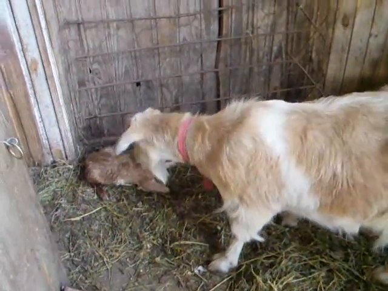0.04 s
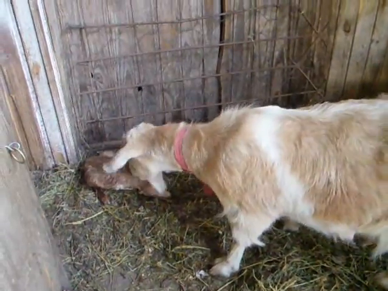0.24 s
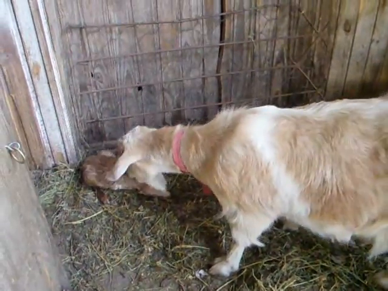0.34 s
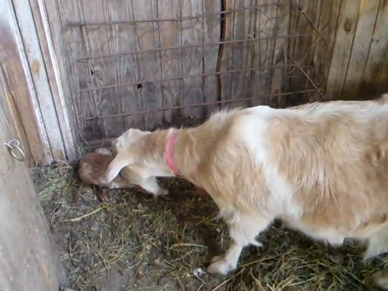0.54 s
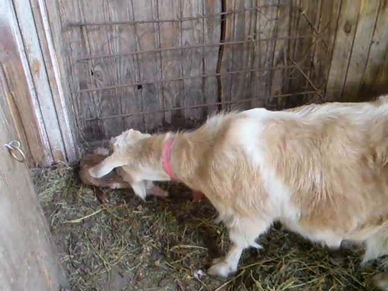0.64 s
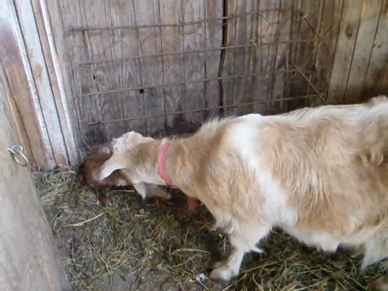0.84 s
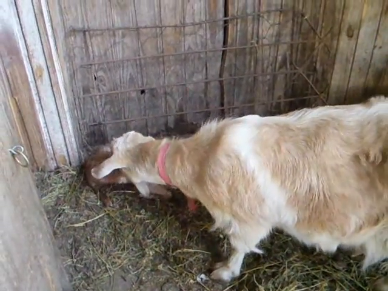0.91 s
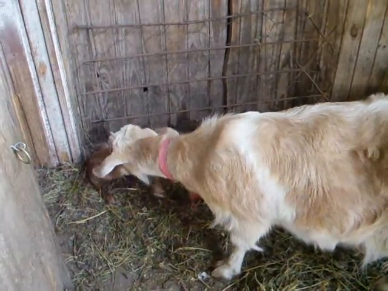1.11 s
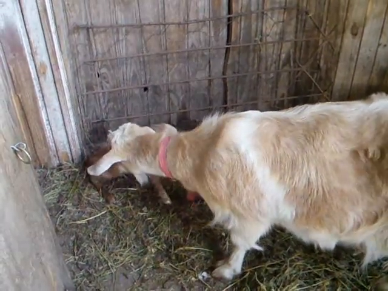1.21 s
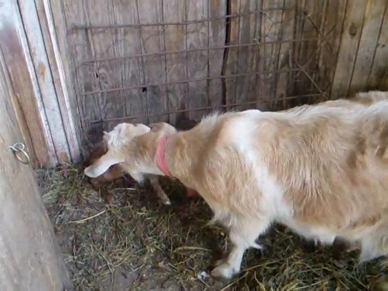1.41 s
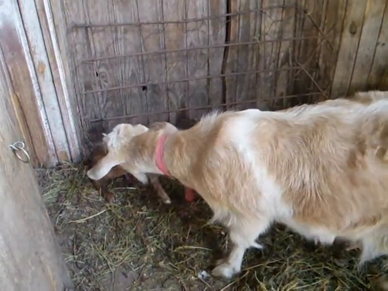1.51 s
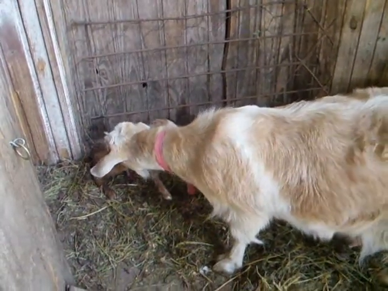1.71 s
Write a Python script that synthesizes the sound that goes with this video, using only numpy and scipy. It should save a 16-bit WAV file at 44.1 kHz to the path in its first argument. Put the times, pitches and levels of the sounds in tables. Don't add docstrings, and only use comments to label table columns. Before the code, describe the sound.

One loud, hoarse-edged kid bleat in a small wooden stall, followed by quiet, creaky goat murmurs.

```python
import sys
import numpy as np
from scipy import signal
from scipy.fft import rfft, irfft
from scipy.io import wavfile
from scipy.ndimage import uniform_filter1d

SR = 44100
rng = np.random.default_rng(int(sys.argv[2]) if len(sys.argv) > 2 else 0)


def ratio_of_db(decibels):
    return 10 ** (np.asarray(decibels, float) / 20)


def store_wav(level_fs):
    pcm = np.round(np.clip(np.atleast_2d(level_fs), -1, 1) * 32767)
    wavfile.write(sys.argv[1], SR, pcm.T.astype(np.int16))


N = 77175
TIME_S = np.arange(N) / SR


def evened(x):
    return x / np.sqrt(np.mean(x ** 2) + 1e-20)


def read(points, hz):
    table_hz, value = np.transpose(points)
    return np.interp(np.log(hz + 1), np.log(table_hz + 1), value)


def coloured(x, points):
    gain = ratio_of_db(read(points, np.fft.rfftfreq(len(x), 1 / SR)))
    return irfft(rfft(x) * gain, len(x))


def resonate(x, hz, width_hz):
    turn = np.exp(2j * np.pi * np.cumsum(hz * np.ones(len(x))) / SR)
    decay = np.exp(-np.pi * abs(width_hz) / SR)
    return 2 * (turn * signal.lfilter([1 - decay], [1, -decay], x / turn + 1e-18)).real


def formant(x, hz, width_hz):
    return resonate(resonate(x, hz, width_hz), hz, 2 * width_hz)


def wobble(size):
    return evened(uniform_filter1d(uniform_filter1d(rng.standard_normal(N), size), size))


# start_s, pitch_hz, effort_db, mouth_opening (factor), brightness_db
BLEAT_COURSE = [
    (0.139, 375, -32, 0.87, 1),
    (0.23, 380.2, -22.5, 0.9, 2),
    (0.258, 402.5, -0.5, 0.96, -9.5),
    (0.329, 405.1, -11, 1.037, 0.36),
    (.46, 409.5, -7, 1.045, -3.3),
    (.52, 413.4, -7.5, 1.094, -2.5),
    (0.784, 425.1, -7, 1.143, -1.2),
    (0.871, 386.5, -9.5, 0.9, -2.5),
    (0.978, 375.3, -45.5, 0.57, -2),
]
# centre_s, pitch_kick_hz, level_change_db, width_s
VOICE_CATCHES = [(0.299, -17.5, -2.5, 0.017), (0.427, -2, -11.5, 0.0062), (0.482, 7, 0.5, 0.0084),
                 (.548, -6, -4, .014), (0.599, 8, 2.5, 0.011), (.635, -3, 0.5, 0.015),
                 (0.724, -2, -4.5, 0.0076), (0.795, -4.5, -3, 0.011)]
# start_s, roughness (0-1)
HOARSENESS = [(.17, .55), (.235, .3), (.265, .06), (.34, .008), (.79, .008), (.84, .04), (.865, .35),
              (.885, .95)]
# centre_hz, width_hz, level_db, mouth_share (of mouth movement)
KID_FORMANTS = [(768.5, 196, -0.5, 0.067), (1183, 158, -11.5, 0.3), (2066, 164, -8.5, 0.17),
                (2411, 367, -2, 1.5), (3350, 540, -6, 0.18), (4020, 900, -5.5, 0.033),
                (6960, 1435, -14, .1), (14360, 2000, -30, 0.15)]


def kid():
    start_s, *columns = np.transpose(BLEAT_COURSE)
    hz, effort_db, mouth, bright_db = (
        uniform_filter1d(np.interp(TIME_S, start_s, column), size=500) for column in columns)
    rough = np.interp(TIME_S, *np.transpose(HOARSENESS))
    for at_s, kick_hz, change_db, width_s in VOICE_CATCHES:
        bump = np.exp(-((TIME_S - at_s) / width_s) ** 2)
        hz = hz + kick_hz * bump
        effort_db = effort_db + change_db * bump
        rough = rough + .018 * bump
    rough = np.clip(rough, 0, 1)

    jitter = .0007 * wobble(size=600) + .1 * rough * wobble(size=60)
    turns = np.cumsum(hz * (1 + jitter)) / SR
    folds = sum(np.cos(2 * np.pi * k * turns - .02 * k ** 2) for k in range(2, 35))
    puffs = (0.13 + np.exp(-(turns % 1) / 0.24)) * rng.standard_normal(N) * ratio_of_db(1.4 * wobble(size=120))
    hoarse = coloured(evened(puffs), [(400, -25), (700, 0)])
    drive = (1 - rough) * evened(folds) + rough * hoarse

    voice = np.zeros(N)
    for k, (centre_hz, width_hz, level_db, share) in enumerate(KID_FORMANTS):
        moved_hz = centre_hz * (1 + share * (mouth - 1))
        gain = ratio_of_db(level_db + bright_db * (k > 0))
        voice += (-1) ** k * gain * formant(drive, moved_hz, width_hz)
    chest = ratio_of_db(-20 + 42 * (mouth - 1)) * np.cos(2 * np.pi * turns) * (1 - rough) ** 12

    late = np.clip((TIME_S - .855) / .03, 0, 1)
    rasp_hz = 1000 * (1 - 1.9 * np.clip(TIME_S - .885, -.04, .07))
    voice = voice + late * ratio_of_db(15) * formant(drive, rasp_hz, 110)

    fade_in = np.clip((TIME_S - start_s[0] + .02) / .07, 0, 1)
    fade_out = np.clip((start_s[-1] + .03 - TIME_S) / .03, 0, 1)
    effort = ratio_of_db(effort_db) * fade_in * fade_out
    return evened(voice) * effort, chest * effort


# start_s, length_s, level_db, pulse_rate_hz, unevenness (0-1)
NICKER_THROBS = [
    (0.025, 0.087, -30.5, 186, 0.09),
    (1.151, 0.029, -40, 120, 0.2),
    (1.187, 0.2, -42.5, 60, .12),
    (1.269, 0.032, -32, 130, 0.4),
    (1.316, 0.083, -23.5, 218, 0.12),
    (1.425, 0.077, -24.5, 215, 0.06),
    (1.552, 0.074, -30.5, 82.4, .15),
    (1.647, 0.08, -52, 73, 0.18),
]
# centre_hz, width_hz, level_db
DOE_FORMANTS = [(693.5, 128, -4), (895, 140, -3), (1029, 199, -8.5), (1580, 170, -21), (2410, 340, -17),
                (3180, 300, -33), (3980, 830, -23.5), (6540, 1340, -29.5), (10800, 3000, -34),
                (13000, 1800, -45)]
# centre_hz, level_db
PULSE_DULLNESS = [(1500, 0), (3000, -6), (8000, -16)]


def doe():
    air_db, hum_db = -7, 7
    knock_hz, knock_width_hz, knock_db = 200, 81, 20
    knocks, breath, nose = np.zeros((3, N))
    pace, size, air = wobble(size=90), wobble(size=40), rng.standard_normal(N)
    for at_s, length_s, level_db, rate_hz, uneven in NICKER_THROBS:
        u = np.clip((TIME_S - at_s) / length_s, 0, 1)
        rate = (u > 0) * rate_hz * np.clip(1 + uneven * pace, .2, 3)
        turns = .999 + np.cumsum(rate) / SR
        arch = np.sin(np.pi * u ** 1.5)
        swell = ratio_of_db(level_db) * (0.47 * (1 - u) + arch) ** (.01 * rate_hz) * (u > 0) * (u < 1)
        clicks = np.diff(np.floor(turns), prepend=0)
        pulses = swell * clicks * ratio_of_db(18 * uneven * size) * np.sqrt(SR / rate_hz)
        knocks += pulses
        breath += swell * ratio_of_db(air_db) * (.35 + 1.6 * np.exp(-(turns % 1) / .25)) * air
        if rate_hz > 120:
            hum = np.sin(2 * np.pi * rate_hz * length_s * u)
            nose += ratio_of_db(level_db + hum_db - 23 * uneven) * arch ** 2 * hum
        else:
            once = resonate(pulses, knock_hz, knock_width_hz)
            nose += ratio_of_db(knock_db) * resonate(once, knock_hz, knock_width_hz)

    drive = coloured(coloured(knocks, PULSE_DULLNESS) + breath, [(300, -30), (420, 0)])
    throat = np.zeros(N)
    for k, (centre_hz, width_hz, level_db) in enumerate(DOE_FORMANTS):
        throat += (-1) ** k * ratio_of_db(level_db) * formant(drive, centre_hz, width_hz)
    return 11.9 * throat, nose


def straw():
    start_s, level_db, high_pass_hz, decay_s = 1.681, -35.5, 2500, 0.00086
    since_s = TIME_S - start_s
    snap = rng.standard_normal(N) * (since_s > 0) * np.exp(-np.abs(since_s) / decay_s)
    return ratio_of_db(level_db) * coloured(snap, [(high_pass_hz / 2, -30), (high_pass_hz, 0)])


# centre_hz, density_db (dB per Hz)
AIR_SPECTRUM = [(12, -60), (20, -21), (35, -29), (64, -3.5), (156, -23), (299, -10), (588, -16),
                (1890, -25), (10000, -47), (13000, -94), (22000, -120)]
# centre_hz, width_hz, level_db (rms)
FAN_HUMS = [(143.6, 2.5, -51), (173.9, 6.8, -53.5), (56, 10, -78)]


def barn_air():
    sound = ratio_of_db(-46 + 1.2 * wobble(size=3000)) * evened(coloured(rng.standard_normal(N), AIR_SPECTRUM))
    for centre_hz, width_hz, level_db in FAN_HUMS:
        once = resonate(rng.standard_normal(N), centre_hz, width_hz)
        sound = sound + ratio_of_db(level_db) * evened(resonate(once, centre_hz, width_hz))
    return sound


# centre_hz, t60_s
STALL_DECAY = [(200, 0.14), (900, 0.33), (3000, 0.34), (8000, 0.091)]
# delay_s, gain (factor)
PLANK_ECHOES = [(.0023, 0.34), (.0051, -0.35), (.0083, 0.78), (.0127, 0.36), (.0191, -0.63), (.027, 0.66)]


def stall(x, wet):
    taps = np.zeros(SR // 2)
    at = np.arange(400, len(taps) - 20, 20)
    taps[at + rng.integers(0, 20, len(at))] = rng.choice([-1., 1.], len(at))
    hz, time_s, bands = signal.stft(taps, SR, nperseg=256)
    decay = ratio_of_db(-60 * time_s / read(STALL_DECAY, hz)[:, None])
    tail = signal.istft(bands * decay, SR, nperseg=256)[1]
    tail = ratio_of_db(-8) * tail / np.linalg.norm(tail)
    for delay_s, gain in PLANK_ECHOES:
        tail[round(delay_s * SR)] += gain
    response = wet * tail
    response[0] += 1
    return signal.fftconvolve(x, response / np.linalg.norm(response))[:N]


def scene():
    voice, chest = kid()
    throat, nose = doe()
    roomy = stall(voice, wet=0.64) + stall(throat + straw(), wet=.55)
    return (roomy + chest + nose + barn_air())[None]


def band_limit(x):
    return signal.sosfilt(signal.butter(12, 15050, fs=SR, output="sos"), x)


# centre_hz, level_db
MIC_RESPONSE = [(4800, 0), (5600, -9), (6600, 0), (10250, -8), (10500, -55), (11650, -55), (11800, -4),
                (13950, -4)]


def record(dry):
    bend, ceiling, knee, offset, edge_hz = .03, .93, 6, .015, 14150
    x = dry[0] + bend * dry[0] ** 2
    x = x / (1 + np.abs(x / ceiling) ** knee) ** (1 / knee)
    x = coloured(x, MIC_RESPONSE + [(edge_hz, -60)])
    return band_limit(np.clip(x + offset, -1, 1)[None])


dry = scene()
out = record(dry)
store_wav(out)
```